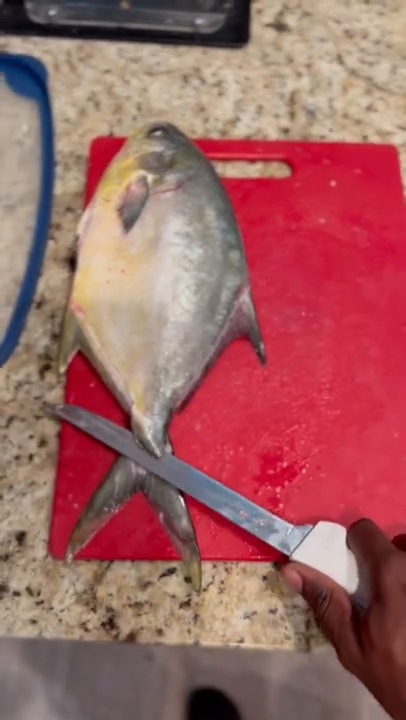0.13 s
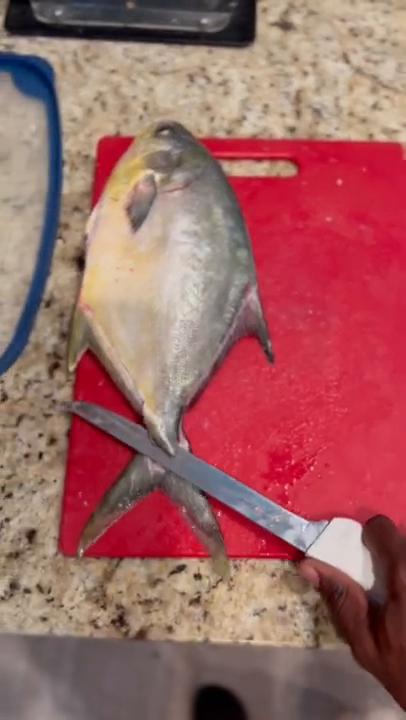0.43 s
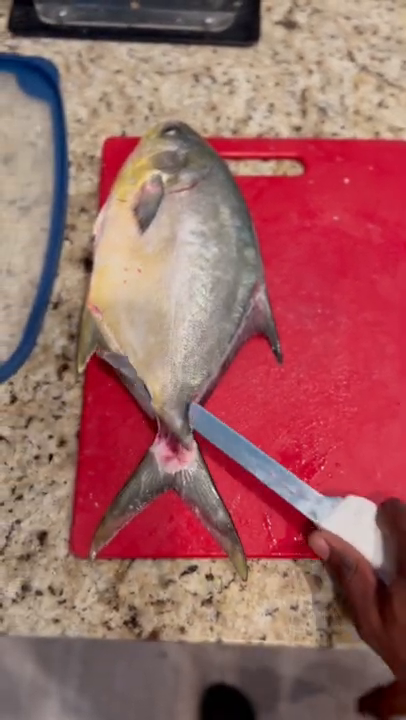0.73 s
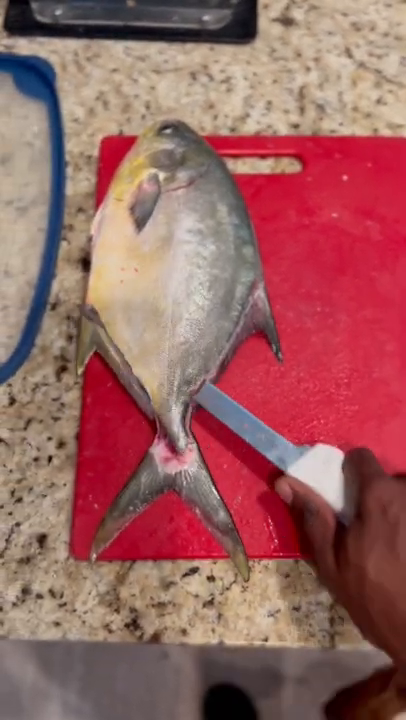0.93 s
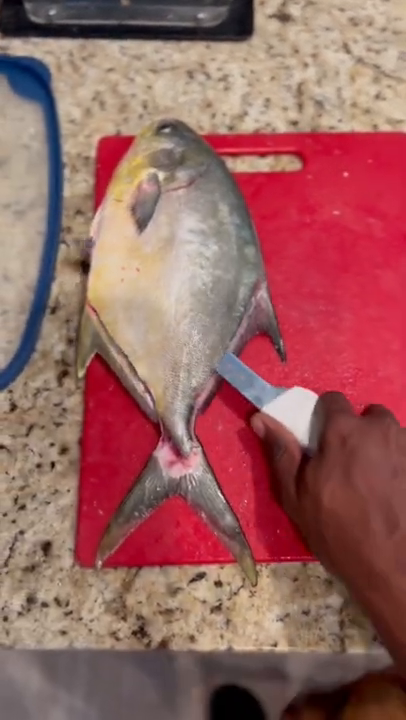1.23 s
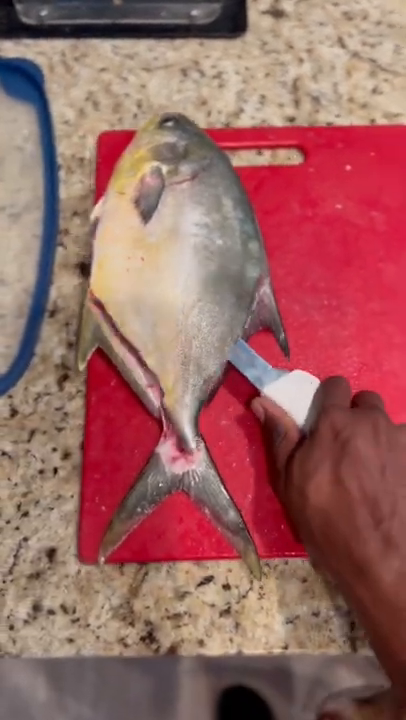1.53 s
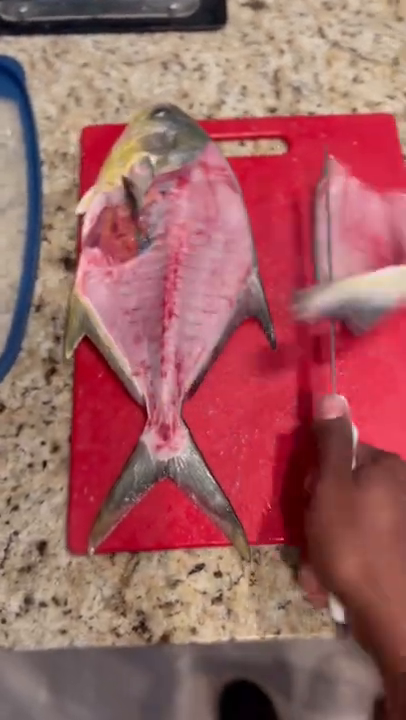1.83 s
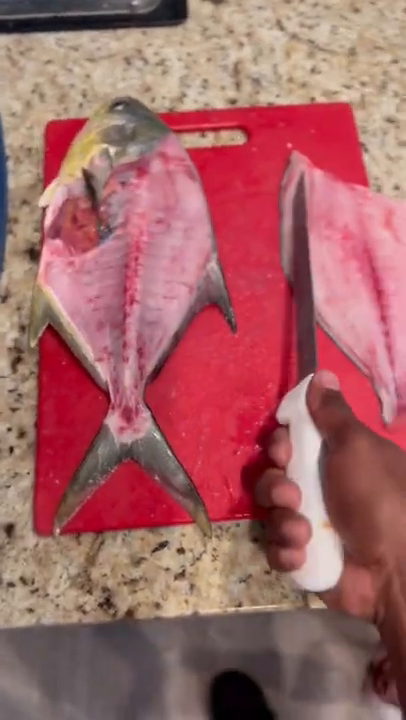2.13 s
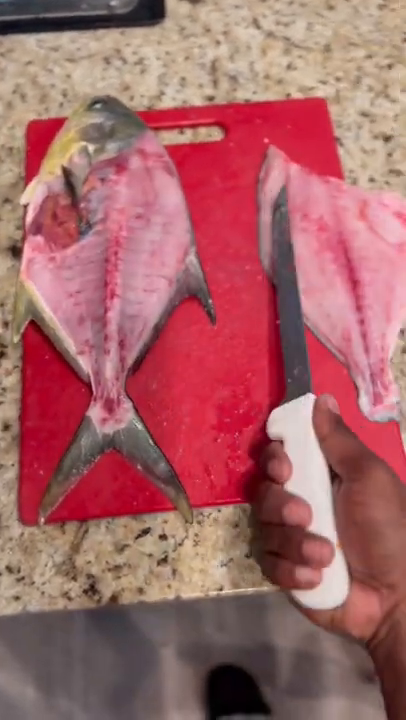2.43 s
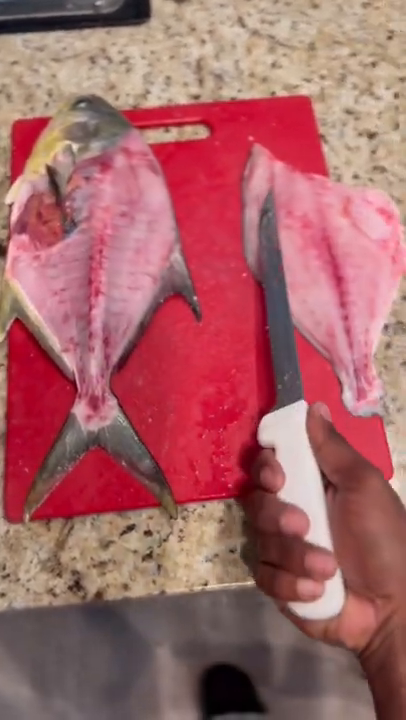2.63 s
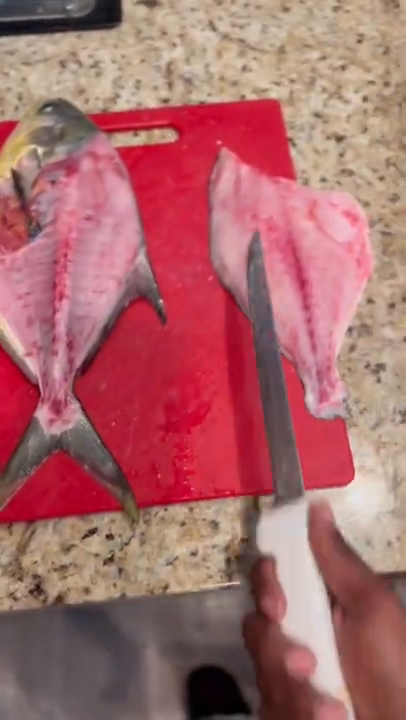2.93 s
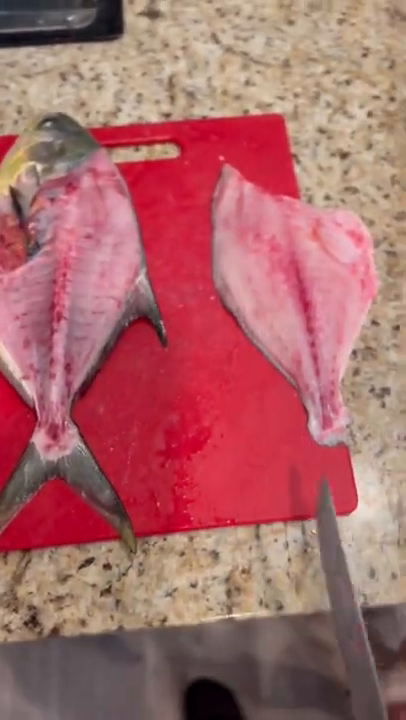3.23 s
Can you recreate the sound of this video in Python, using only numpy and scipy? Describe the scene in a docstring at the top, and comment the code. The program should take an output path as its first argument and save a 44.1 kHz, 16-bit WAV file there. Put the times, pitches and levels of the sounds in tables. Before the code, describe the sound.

A knife scrapes softly through a wet fish, ticking over bones. The fillet peels off and slaps onto a plastic board, then the blade faintly swishes away. Low kitchen rumble and soft handling bumps reach the close hand-held microphone.

```python
"""Filleting a fish

A thin knife slides under a fish fillet on a plastic board, scraping through wet flesh and ticking over
bones. The fillet peels off and slaps down, making the board ring briefly, and the knife swishes away.
A hand-held phone hears it from above, over steady kitchen air noise, a deep room rumble and soft
bumps of the grip."""
import sys
import numpy as np
from scipy import signal
from scipy.fft import rfft, irfft, next_fast_len
from scipy.io import wavfile
from scipy.ndimage import uniform_filter1d

SR = 44100
rng = np.random.default_rng(int(sys.argv[2]) if len(sys.argv) > 2 else 0)


def persist_wave(psi):
    """Save psi, clipped to +-1, as 16-bit WAV."""
    counts = np.round(np.clip(psi, -1, 1) * 32767).astype(np.int16)
    wavfile.write(sys.argv[1], SR, np.atleast_2d(counts).T)


N = 148617

# Tone of the kitchen air: pitch_hz, gain_db
AIR_TONE = [(47, -86), (80, -22), (124, -1), (155, -2), (242, -25.5), (295, -29.5), (329, -39), (411, -29),
            (459, -18.5), (639, -16.5), (698, -11.5), (746, -10), (1040, -16.5), (1330, -10.5), (1480, -17),
            (1730, -18.5), (2870, -28), (3140, -26.5), (3920, -29), (4780, -25), (5580, -36.5), (6090, -25),
            (6960, -37), (8000, -37.5), (9200, -40), (10000, -56), (15800, -34)]
# Loudness of the air as the phone moves: time_s, level_db
AIR_LOUDNESS = [(0.0, -59.5), (0.26, -58), (0.38, -58), (1.44, -59), (1.99, -59), (3.28, -59), (3.37, -60)]
# Loudness of the room rumble: time_s, level_db
RUMBLE_LOUDNESS = [(0.0, -43), (0.04, -46.5), (0.16, -52), (0.26, -42), (0.39, -48), (0.5, -45),
                   (0.66, -41), (0.69, -48.5), (1.13, -43), (1.16, -36.5), (1.25, -48.5), (1.29, -56),
                   (1.32, -37.5), (1.37, -43), (1.41, -41), (1.45, -48), (1.62, -45), (2.05, -44),
                   (2.16, -39), (2.23, -42.5), (2.29, -37.5), (2.33, -39.5), (2.35, -45.5), (2.97, -41.5),
                   (2.98, -39.5), (3.37, -44)]
# Bumps of the hand on the phone: start_s, thud_peak_db, deep_peak_db
GRIP_BUMPS = [(0.014, -30, -67), (0.243, -42, -36), (0.499, -42.5, -27), (0.532, -33, -45.5),
              (0.572, -38.5, -40), (0.594, -36.5, -34), (0.613, -34, -29), (0.63, -39.5, -36.5),
              (0.646, -39.5, -32.5), (0.971, -42, -56), (1.051, -36, -36), (1.111, -42, -30),
              (1.136, -34.5, -27.5), (1.148, -33.5, -28), (1.169, -37.5, -29.5), (1.194, -54, -33),
              (1.79, -36.5, -68), (1.887, -58, -64), (1.949, -44, -38), (2.222, -44, -50),
              (2.681, -40.5, -43), (2.778, -25.5, -44), (2.909, -31.5, -36), (2.985, -26, -24.5),
              (3.085, -34, -28.5), (3.129, -43, -32), (3.164, -34.5, -32), (3.187, -37, -34),
              (3.305, -38, -33)]
# Notes the phone body rings at: pitch_hz, gain_db, fade_s
PHONE_NOTES = [(126.8, 3.5, 0.083), (153.9, 5.5, 0.068), (230.5, -6, 0.047), (311, -17, 0.046)]

# Low ranges where the rubbed board sounds: pitch_hz, width_hz, level_db
RUB_BANDS = [(137, 79, 5), (269.5, 48, -5.5), (412, 290, -7.5)]
# Flesh rubbing on the board: time_s, gain_db
RUB_LOUDNESS = [(0.0, -52.5), (0.04, -57), (0.07, -64.5), (0.28, -63), (0.33, -57), (0.38, -57),
                (0.41, -61.5), (0.62, -58), (0.7, -67), (1.16, -61), (1.23, -67), (1.85, -62), (1.9, -50),
                (2.18, -71), (2.25, -56.5), (2.38, -69.5), (2.75, -68.5), (2.77, -63), (2.89, -64),
                (2.99, -56.5), (3.04, -74), (3.16, -55.5), (3.28, -71), (3.32, -60.5), (3.37, -75)]
# Bright ranges of the swish: pitch_hz, width_hz, level_db
SWISH_BANDS = [(3440, 5100, 10), (8420, 1100, 2.5), (14200, 6800, 1.5)]
# The knife being drawn away: time_s, gain_db
SWISH_LOUDNESS = [(2.75, -95), (2.87, -84), (3.05, -81), (3.12, -87), (3.17, -79), (3.22, -85), (3.37, -85)]
# Very high ranges of the sizzle: pitch_hz, width_hz, level_db
SIZZLE_BANDS = [(11140, 7300, 3.5), (14400, 3500, -7)]
# The wet sizzle coming and going: time_s, gain_db
SIZZLE_LOUDNESS = [(0, -82), (.1, -91), (.25, -83), (.27, -74), (.33, -85), (.5, -89), (.76, -90),
                   (.8, -78), (.9, -82), (1.05, -82), (1.14, -85), (1.22, -82), (1.27, -84), (1.32, -84),
                   (1.46, -100), (1.55, -75), (1.61, -77), (1.66, -70), (1.72, -84), (1.76, -89),
                   (1.86, -88), (1.92, -62), (1.96, -91), (2.1, -100)]
# Middle ranges of the rasp: pitch_hz, width_hz, level_db
RASP_BANDS = [(1208, 430, -3.5), (2140, 1900, -8.5)]
# The blade passing through flesh: time_s, gain_db
RASP_LOUDNESS = [(.05, -65), (.2, -69), (.4, -64), (.7, -80), (1.05, -68), (1.38, -86), (1.46, -61),
                 (1.52, -55.5), (1.581, -63), (1.66, -61.5), (1.75, -68), (1.86, -62), (1.9, -55.5),
                 (1.95, -55.5), (2.02, -62.5), (2.1, -68)]
# Ranges where blade and wet flesh ring: pitch_hz, width_hz, level_db
SCRAPE_BANDS = [(3000, 3800, -17), (4250, 3000, -2.5), (6300, 850, -3), (8460, 1470, -4.5)]
# Wet scraping and peeling: time_s, gain_db
SCRAPE_LOUDNESS = [(0, -75), (.04, -77), (.06, -67), (.11, -70), (.25, -72.5), (.28, -68.5), (.35, -74.5),
                   (.75, -75.5), (.8, -74), (.95, -73.5), (1.07, -64), (1.14, -70), (1.23, -70.5),
                   (1.27, -65), (1.38, -77), (1.48, -69.5), (1.56, -63.5), (1.6, -65.5), (1.62, -77),
                   (1.65, -59), (1.69, -63), (1.73, -69.5), (1.86, -74.5), (1.88, -62.5), (1.91, -58),
                   (1.94, -68.5), (2.0, -73.5), (2.2, -98)]

# Notes the plastic board rings at: pitch_hz, gain_db, fade_s
BOARD_NOTES = [(490, -10, 0.05), (906, -7, 0.027), (1112, 7.5, 0.021), (1310, -6.5, 0.041),
               (1707, -10, 0.023), (2033, -11.5, 0.032), (2460, -14.5, 0.018), (3600, -14.5, 0.0083)]
# Fillet and blade hitting the board: start_s, peak_db, outer_boost_db_per_octave, pitch_factor
BOARD_SLAPS = [(1.44, -50, -9, 1.35), (1.649, -50, 3, 0.99), (1.652, -41, -3, 1.11), (1.654, -46, 14, 1.03),
               (1.659, -47, -3, 1.1), (1.875, -36, 5.5, 0.99), (1.881, -39.5, 12, 1.01),
               (1.887, -45, -1, 0.82), (1.912, -53.5, 0, 1.17), (1.931, -54, -4, 1.25),
               (1.9659, -34.5, -4, 1.028), (1.969, -43, 2, 1), (1.976, -46, 1, 1.06), (1.982, -40, 0, 0.95)]
# The blade catching bones and scales: start_s, level_db, pitch_hz, width_share, snap_db, fizz_db
BONE_TICKS = [(0.0391, -42.5, 6650, 0.37, -12, -19), (0.0457, -42.5, 6800, 0.55, -12, -19),
              (0.2588, -47.5, 7850, 0.36, -8, -19), (0.389, -53, 4500, 0.31, -8, -14),
              (0.441, -60, 3830, 0.33, -8, -19), (0.5202, -47.5, 5900, 0.33, -8, -14),
              (0.6616, -48, 4380, 0.46, -8, -19), (0.6682, -54, 3770, 0.33, -8, -19),
              (0.7791, -55, 7850, 0.33, -8, -17), (0.7991, -54, 8740, 0.33, -6, -19),
              (0.829, -58, 4600, 0.33, -6, -19), (0.9158, -47, 6300, 0.33, -2, -19),
              (0.9204, -46.5, 6340, 0.38, -8, -16), (0.931, -54, 3250, 0.33, -8, -17),
              (0.9836, -57, 8900, 0.33, -8, -19), (0.9943, -41.5, 3640, 0.33, -11, -14),
              (1.026, -61, 6680, 0.33, -8, -19), (1.046, -41.5, 6500, 0.28, -11, -16),
              (1.0517, -51, 4840, 0.3, -8, -19), (1.1156, -50.5, 6440, 0.37, -10, -19),
              (1.1633, -51.5, 4860, 0.33, -8, -21), (1.1872, -49.5, 8320, 0.33, -8, -19),
              (1.2424, -60, 3660, 0.33, -8, -19), (1.2476, -49, 5460, 0.33, -8, -19),
              (1.2512, -45, 5900, 0.29, -8, -19), (1.258, -56, 6580, 0.33, -8, -19),
              (1.2695, -45, 8500, 0.28, -8, -19), (1.2726, -46, 6430, 0.33, -8, -19),
              (1.2874, -55, 8370, 0.3, -8, -19), (1.3857, -51.5, 4700, 0.43, -8, -19),
              (1.4416, -52.5, 4090, 0.38, -8, -19), (1.4721, -55, 3590, 0.33, -8, -19),
              (1.499, -45.5, 9100, 0.27, -12, -15), (1.5259, -48, 3980, 0.33, -8, -12),
              (1.5393, -48, 9550, 0.33, -8, -19), (1.552, -48, 9280, 0.3, -8, -19),
              (1.5764, -62, 6460, 0.33, -10, -19), (1.5854, -48, 9200, 0.24, -13, -19),
              (1.5998, -46.5, 9100, 0.36, -8, -19), (1.6262, -56, 3720, 0.38, -8, -19),
              (1.6304, -50, 8300, 0.37, -8, -19), (1.639, -49, 8400, 0.36, -8, -17),
              (1.6531, -48, 4090, 0.4, -5, -19), (1.6622, -45.5, 8250, 0.47, -11, -14),
              (1.665, -47, 4210, 0.33, -8, -22), (1.6718, -52, 8050, 0.33, -8, -19),
              (1.6784, -45, 6070, 0.3, -8, -19), (1.7, -44, 3760, 0.23, -1, -14),
              (1.7072, -54, 3550, 0.26, -11, -9), (1.7644, -55, 4700, 0.33, -4, -17),
              (1.8765, -51, 4180, 0.33, -10, -19), (1.8804, -47, 3480, 0.37, -8, -19),
              (1.901, -48, 9120, 0.33, -8, -19), (1.92, -41.5, 4500, 0.33, -10, -16),
              (3.1634, -62, 3740, 0.33, -5, -19)]

# How far the left microphone's wave runs ahead of the right: pitch_hz, lead_radians
LEFT_LEAD = [(100, 0), (400, -.1), (860, -.4), (1120, .3), (2240, -.1), (2840, -.9), (3100, -.1),
             (4390, .1), (5680, -.9), (6550, -1.2), (8960, -1.3), (10200, -.8), (11400, -1.3),
             (15500, -1.8)]
# How much louder the left is than the right: pitch_hz, gain_db
LEFT_BOOST = [(60, -0.5), (110, -0.5), (200, 0.5), (380, 0.0), (700, 0.0), (1290, -2.5), (2380, 0.0),
              (4400, 1.0), (8120, 0.5), (15000, 0.0)]
# How alike the two sides are: pitch_hz, likeness_0_to_1
SIDE_LIKENESS = [(60, .99), (130, .98), (290, .86), (640, .6), (1410, .82), (2400, .62), (4000, .66),
                 (6820, .7), (10000, .6), (15000, .3)]
# Tone of both microphones: pitch_hz, gain_db
MIC_TONE = [(25, -17), (45, 0.5), (7000, 1), (9200, 3), (9900, -3.5), (11000, -1.5), (13500, -5.5),
            (15500, -11)]


def gain(db):
    """Turns decibels into a number to multiply by."""
    return 10 ** (np.asarray(db) / 20)


def set_level(sound, db):
    """Scales a sound to an average (RMS) level."""
    return sound * gain(db) / np.sqrt(np.mean(sound ** 2))


def over_pitch(table, hz):
    """Reads between a table's rows on a musical (log) pitch scale."""
    pitches, values = np.array(table, float).T
    return np.interp(np.log(hz + 1), np.log(pitches), values)


def over_time(table):
    """Turns a loudness table into a gain per sample, silent beyond its ends."""
    times, db = np.array(table, float).T
    return gain(np.interp(np.arange(N) / SR, times, db, left=-120, right=-120))


def band(sound, hz, width_hz):
    """Keeps the part of a sound near one pitch."""
    return signal.lfilter(*signal.iirpeak(hz, hz / width_hz, fs=SR), sound)


def wander(steps_per_s):
    """Random steps smoothed into a drifting curve."""
    hold = int(SR / steps_per_s)
    steps = np.repeat(rng.standard_normal(N // hold + 1), hold)
    return uniform_filter1d(uniform_filter1d(steps, hold), hold)[:N]


def add(out, start_s, sound):
    """Mixes a sound in at its start time."""
    start = int(start_s * SR)
    out[start:start + len(sound)] += sound[:N - start]


def unit_peak(sound):
    """Scales a sound so its peak is 1."""
    return sound / np.abs(sound).max()


def ring(notes, nudges, push_s):
    """A struck object: its notes swell over about push_s, and each dies away by 60 dB in fade_s."""
    t = np.arange(SR // 4) / SR
    sound = 0
    for (hz, db, fade_s), nudge in zip(notes, nudges):  # nudges make each hit a little different
        wave = np.sin(2 * np.pi * hz * (1 + .03 * nudge) * t + nudge)
        sound += gain(db + 2 * nudge) * wave * 1000. ** (-t / fade_s)
    return unit_peak(sound * (1 - np.exp(-(t / push_s) ** 2)))


def hiss():
    """Plain, smooth noise."""
    return rng.standard_normal(N)


def grit(grains_per_s=2500, uneven_db=2.2):
    """Noise broken into many tiny, uneven grains."""
    starts = rng.random(N) < grains_per_s / SR
    energy = starts * gain(2 * uneven_db * rng.exponential(size=N))
    fading = signal.lfilter([1], [1, -.97], energy)
    return np.sqrt(fading) * hiss()


def resonate(bands, make_noise):
    """Filters fresh noise twice into each pitch range and adds them up."""
    return sum(set_level(band(band(make_noise(), hz, width), hz, width), db) for hz, width, db in bands)


def kitchen_air(swell_db=.5, flicker_db=1.2):
    """Two separate airy noises of one tone; their octaves swell together and flicker on their own."""
    hz = np.arange(N // 2 + 1) * SR / N
    spectrum = rfft(rng.standard_normal((2, N))) * gain(over_pitch(AIR_TONE, hz))
    swell = swell_db * wander(0.36)
    octaves_up = np.log2((hz + 1) / 60)
    out = 0
    for octave in range(10):
        share = np.clip(1 - np.abs(octaves_up - octave), 0, 1)
        out += irfft(spectrum * share, N) * gain(swell + flicker_db * wander(12))
    return set_level(out, 0) * over_time(AIR_LOUDNESS)


def room_rumble(pitch_hz=51.85, width_hz=26.6, steadiness=.4):
    """The room hums at one deep pitch: narrow noise with its swells partly evened out."""
    noise = rng.standard_normal((2, N))
    hum = band(band(noise, pitch_hz, width_hz), pitch_hz, width_hz)
    power = uniform_filter1d(set_level(hum, 0) ** 2, int(SR / pitch_hz)) + .05
    return set_level(hum / power ** (steadiness / 2), 0) * over_time(RUMBLE_LOUDNESS)


def grip_bumps(push_s=0.0047, deep_hz=66, deep_fade_s=0.06):
    """The hand sends soft thuds through the phone body, each with a deep note under it."""
    out = np.zeros(N)
    for start_s, thud_db, deep_db in GRIP_BUMPS:
        nudges = rng.standard_normal(5) / 2
        thud = ring(PHONE_NOTES, nudges[:4], push_s)
        deep = ring([(deep_hz, 0, deep_fade_s)], nudges[4:], 2 * push_s)
        add(out, start_s, gain(thud_db) * thud + gain(deep_db) * deep)
    return out


def flesh_rub():
    """Flesh rubs on the board and stirs its low, dull tones."""
    return resonate(RUB_BANDS, hiss) * over_time(RUB_LOUDNESS)


def knife_swish():
    """A smooth, bright hiss as the knife is drawn away."""
    return resonate(SWISH_BANDS, hiss) * over_time(SWISH_LOUDNESS)


def wet_sizzle():
    """Tiny grains make a very high, wet sizzle."""
    return resonate(SIZZLE_BANDS, grit) * over_time(SIZZLE_LOUDNESS)


def blade_rasp():
    """The blade cuts through flesh with a lower, grainy rasp."""
    return resonate(RASP_BANDS, grit) * over_time(RASP_LOUDNESS)


def wet_scrape():
    """Scraping and peeling make grains that ring in the blade and wet flesh."""
    return resonate(SCRAPE_BANDS, grit) * over_time(SCRAPE_LOUDNESS)


def board_slaps(middle_hz=1130, push_s=0.00043, variety=.4):
    """Blows ring the board, pitched by where they land; flat smacks boost its lowest and highest notes."""
    out = np.zeros(N)
    for start_s, peak_db, outer_boost, pitch_factor in BOARD_SLAPS:
        notes = [(hz * pitch_factor, db + outer_boost * abs(np.log2(hz / middle_hz)), fade_s)
                 for hz, db, fade_s in BOARD_NOTES]
        nudges = variety * rng.standard_normal(len(notes))
        add(out, start_s, gain(peak_db) * ring(notes, nudges, push_s))
    return out


def bone_ticks(rise_s=.001, burst_s=.0008, tail_s=.01, snap_hz=10500):
    """The blade catches a bone or scale: a short pitched click, a bright snap and a trail of wet fizz."""
    out = np.zeros(N)
    t = np.arange(3000) / SR
    burst = np.exp(-((t - rise_s) / burst_s) ** 2)
    for start_s, level_db, hz, width_share, snap_db, fizz_db in BONE_TICKS:
        noise = rng.standard_normal(len(t))
        width_hz = width_share * hz
        fizz = gain(fizz_db) * np.exp(-t / tail_s) * (t > rise_s)
        click = band(noise * (burst + fizz), hz, width_hz)
        click = unit_peak(band(click, hz, 2 * width_hz))
        snap = unit_peak(band(noise * burst, snap_hz, width_hz=7000))
        add(out, start_s, gain(level_db) * (click + gain(snap_db) * snap))
    return out


def microphones(direct, scattered):
    """Both sides share the direct sound; the scattered one is added left and subtracted right."""
    size = next_fast_len(N + 4096)
    hz = np.arange(size // 2 + 1) * SR / size
    likeness = over_pitch(SIDE_LIKENESS, hz)
    shared = rfft(direct, size) * np.sqrt((1 + likeness) / 2)
    spread = rfft(scattered, size) * np.sqrt((1 - likeness) / 2)
    lean_left = gain(over_pitch(LEFT_BOOST, hz) / 2) * np.exp(.5j * over_pitch(LEFT_LEAD, hz))
    sides = np.array([(shared + spread) * lean_left, (shared - spread) / lean_left])
    return irfft(sides * gain(over_pitch(MIC_TONE, hz)), size)[:, :N]


def scene():
    """Close sounds arrive directly and as short echoes; air and rumble come from all round."""
    close = bone_ticks() + wet_scrape() + blade_rasp() + wet_sizzle()
    close += board_slaps() + grip_bumps() + flesh_rub() + knife_swish()
    echoes = rng.standard_normal(2000) * np.exp(-np.arange(2000) / 400.)  # 45 ms long
    echoes /= np.sqrt(np.sum(echoes ** 2))
    scattered = signal.fftconvolve(close, echoes)[:N]
    room = kitchen_air() + room_rumble()
    return microphones(close + room[0], scattered + room[1])


def record(dry):
    """Each microphone adds its own faint hiss, and the phone cuts the highest treble."""
    hiss_db, top_hz = -85, 15800
    bright_noise = np.diff(rng.standard_normal((2, N + 1)))
    treble_cut = signal.ellip(8, .2, 70, top_hz, fs=SR, output="sos")
    return signal.sosfilt(treble_cut, dry + set_level(bright_noise, hiss_db))


dry = scene()
out = record(dry)
persist_wave(out)
```